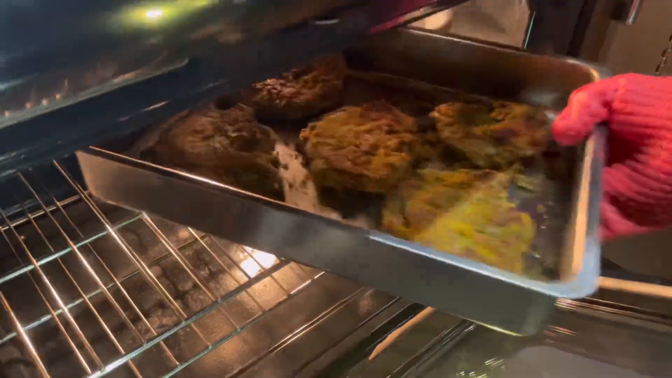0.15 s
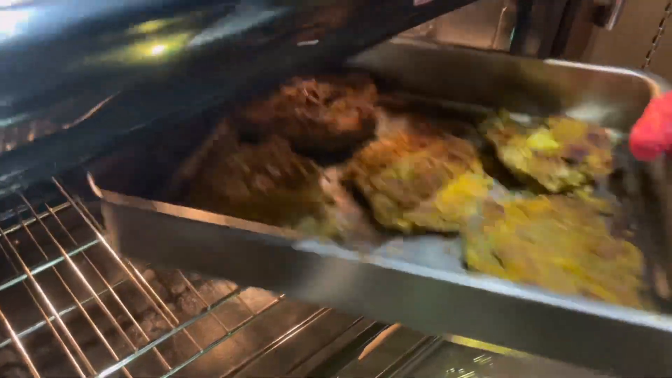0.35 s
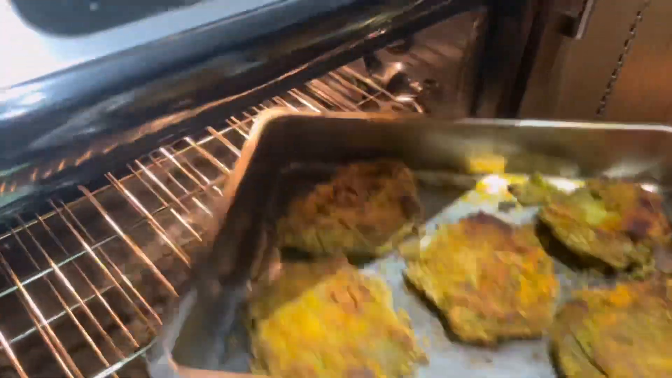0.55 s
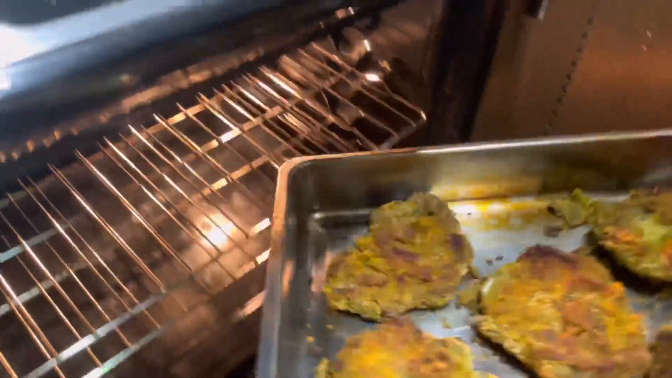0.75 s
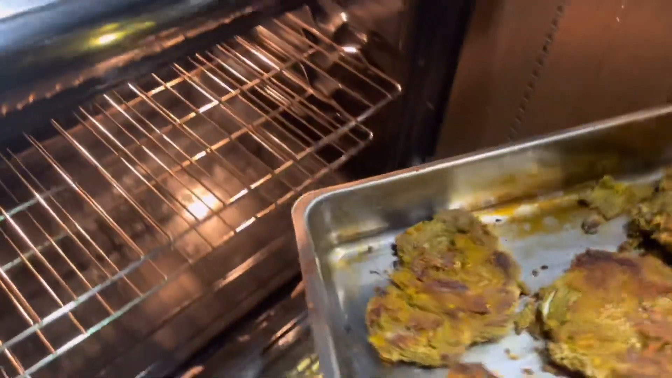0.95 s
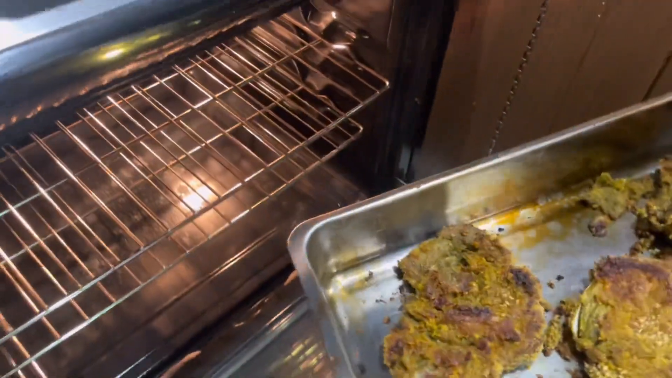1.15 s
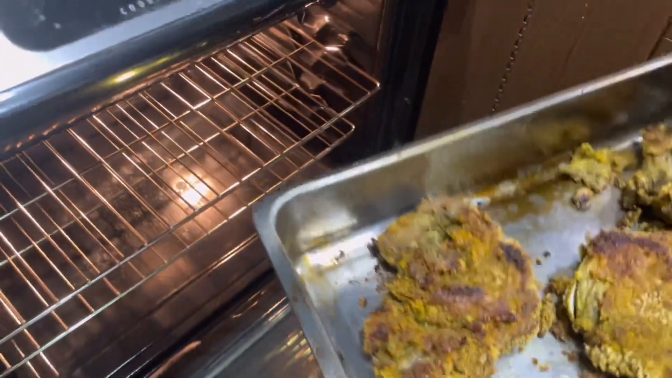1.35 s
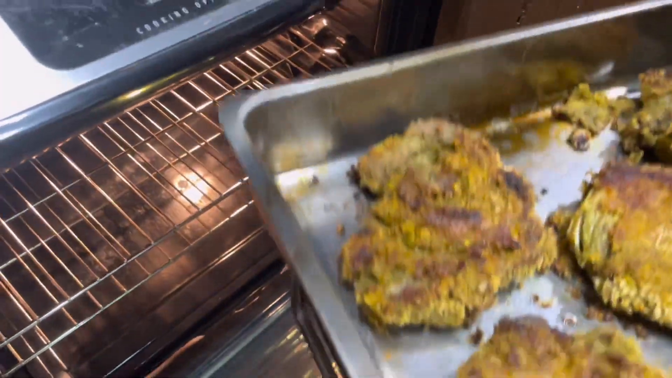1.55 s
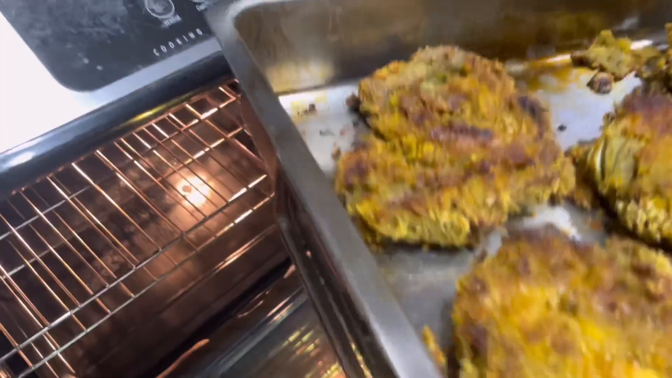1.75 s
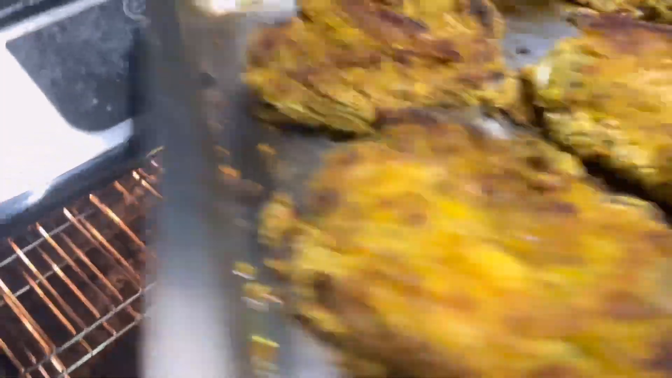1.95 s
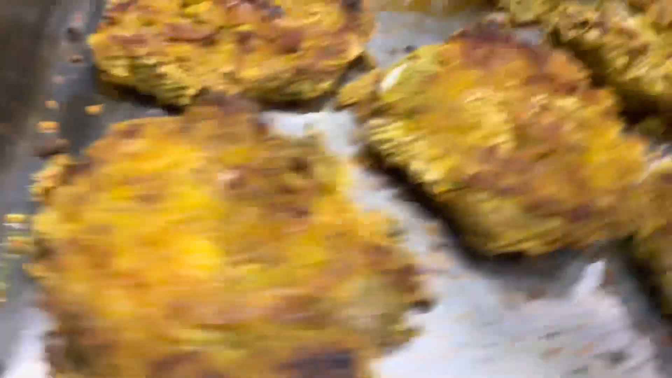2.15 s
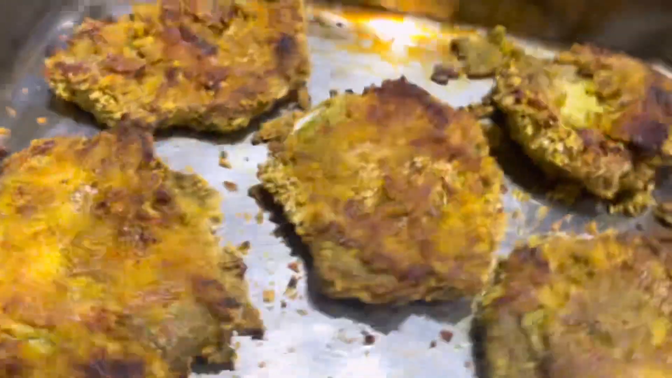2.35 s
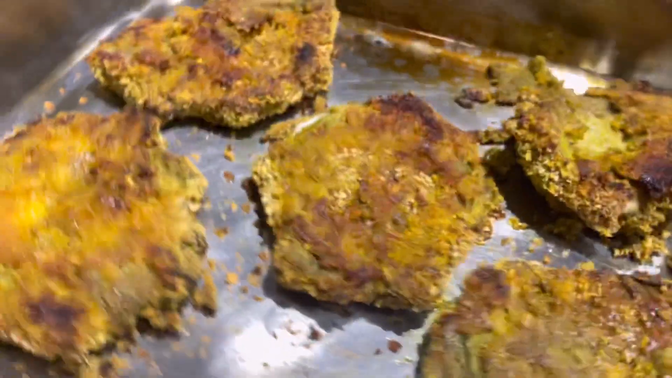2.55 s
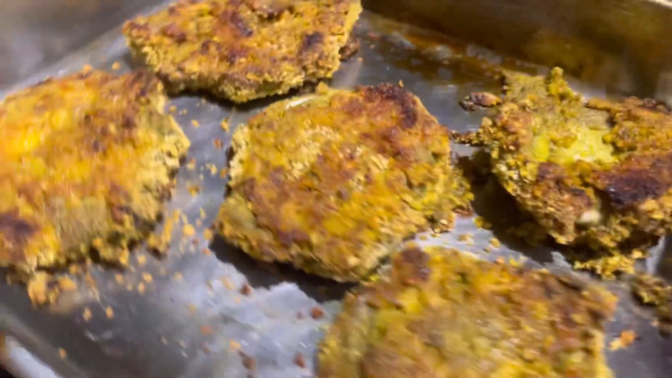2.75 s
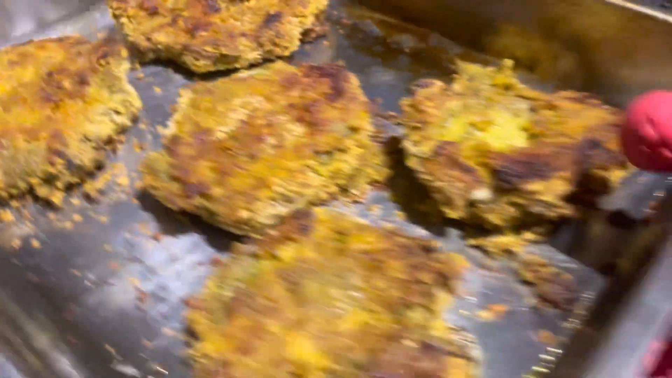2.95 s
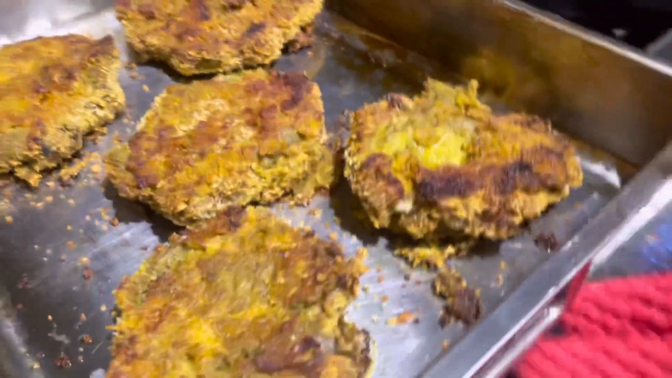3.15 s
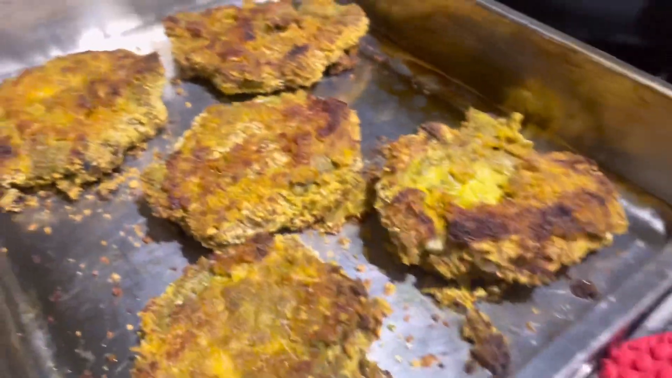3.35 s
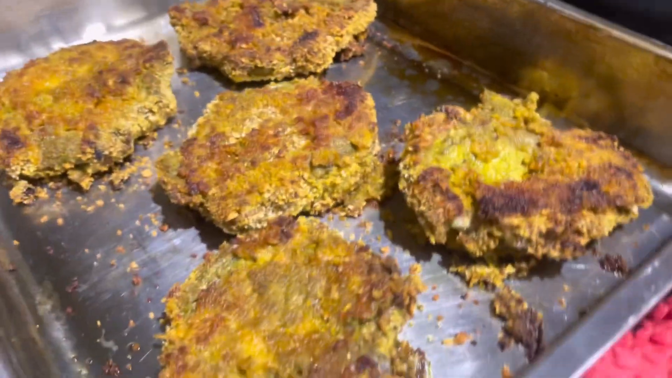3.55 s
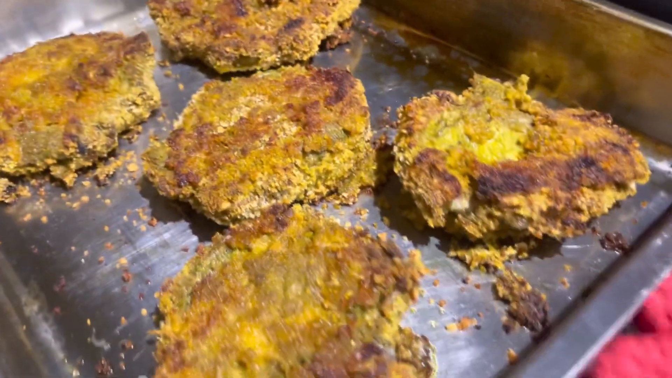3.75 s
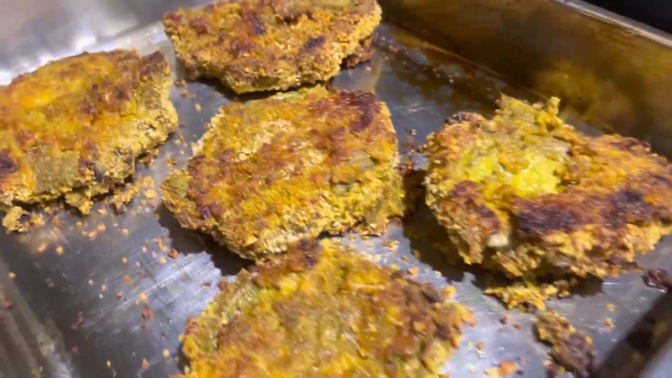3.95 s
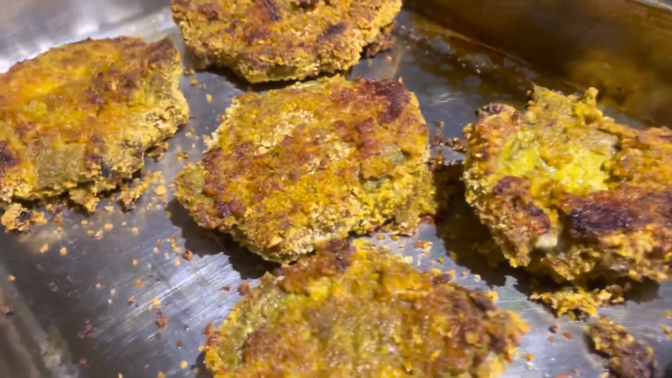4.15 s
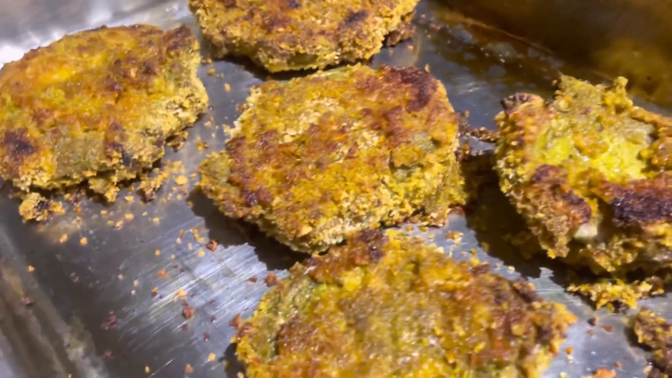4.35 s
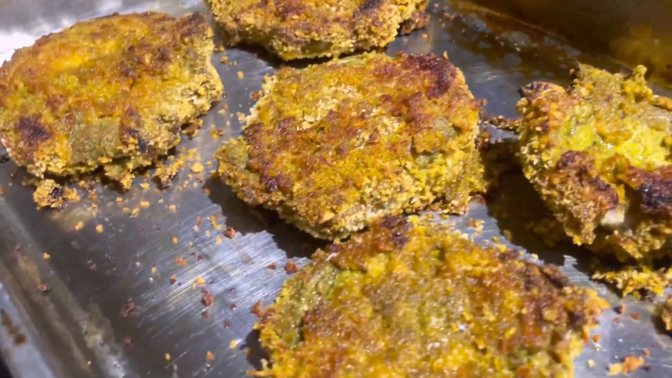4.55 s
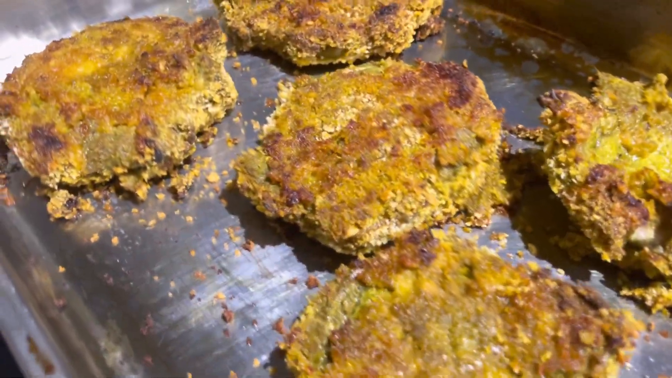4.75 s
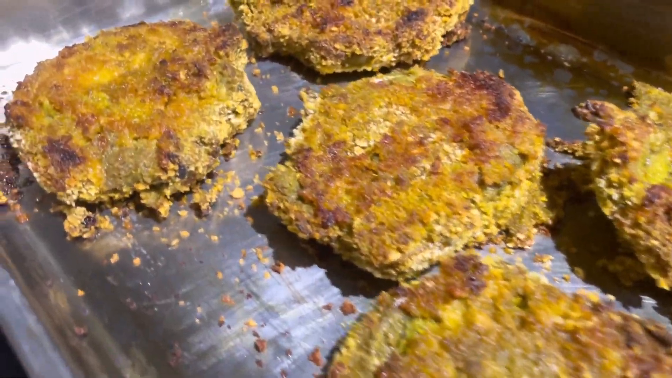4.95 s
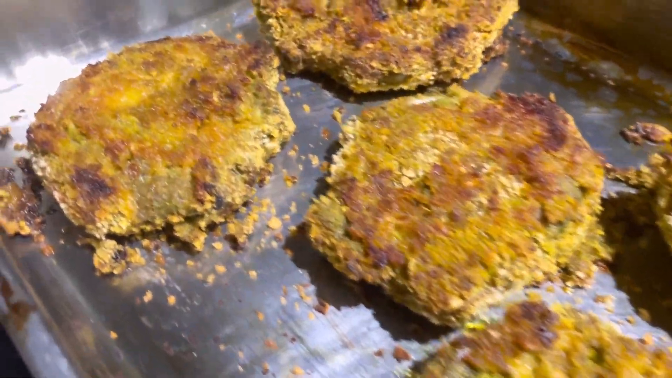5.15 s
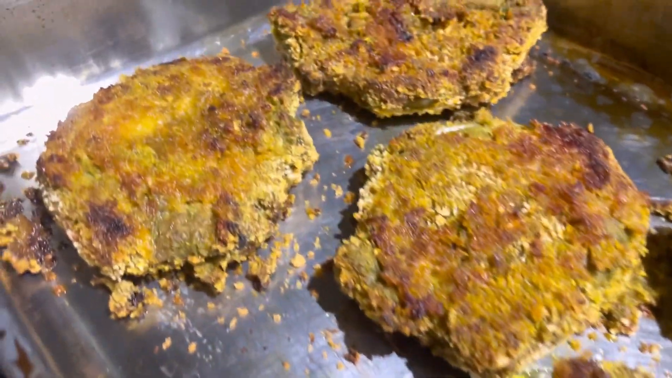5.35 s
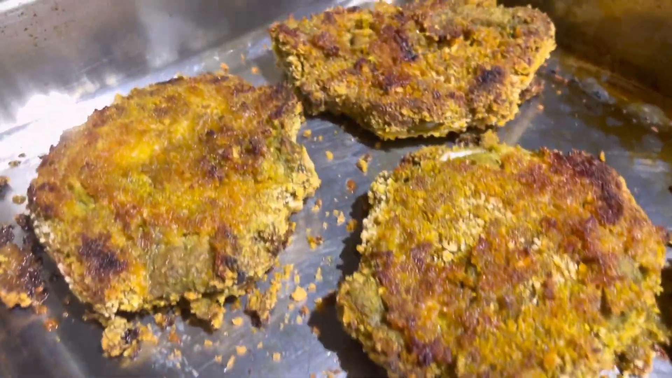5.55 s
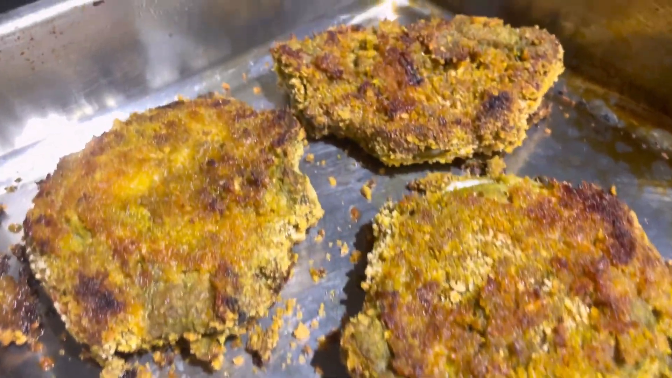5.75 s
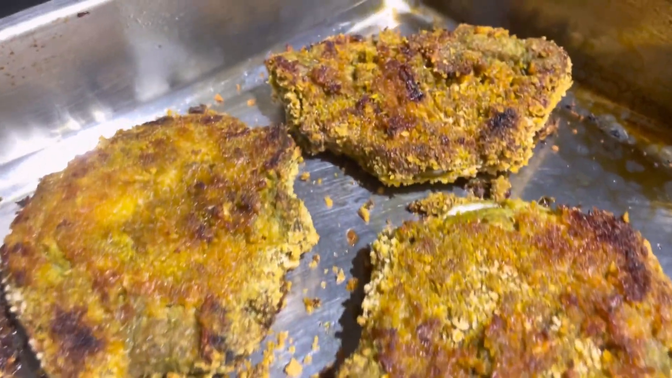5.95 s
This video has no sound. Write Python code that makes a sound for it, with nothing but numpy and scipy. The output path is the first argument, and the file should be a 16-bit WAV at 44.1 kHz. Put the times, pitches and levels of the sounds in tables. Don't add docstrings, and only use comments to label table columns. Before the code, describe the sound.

A baking tray clicks and scrapes out of an oven, bangs a few times mid-way, and finally settles with soft thuds and faint squeaks over constant fan hum.

```python
import sys
import numpy as np
from scipy import signal
from scipy.fft import rfft, irfft, next_fast_len
from scipy.io import wavfile
from scipy.ndimage import uniform_filter1d

SR = 44100
rng = np.random.default_rng(int(sys.argv[2]) if len(sys.argv) > 2 else 0)


def to_linear_factor(level_db):
    exponent = np.asarray(level_db, float) / 20
    return 10 ** exponent


def transcribe(signal):
    frames = np.atleast_2d(signal).T
    limited = np.clip(frames, -1, 1)
    pcm = np.round(limited * 32767).astype(np.int16)
    wavfile.write(sys.argv[1], SR, pcm)


N = 264644
T = np.arange(N) / SR
HZ = np.fft.rfftfreq(next_fast_len(N), 1 / SR)

# time in seconds, swell in dB.
FAN_SWELL = [(0, 1.5), (.35, -2), (.8, -2.5), (2.2, -2.5), (2.7, 2.5), (3.4, 0), (4.1, 1.5), (4.9, 0.8),
             (5.4, 3), (6, 3)]
# frequency in Hz, level change in dB per dB of swell.
FAN_SHARE = [(60, 1.65), (200, 0.44), (1000, 1.12), (4000, 0.7)]
# time in seconds, turn from 0 (oven) to 1 (worktop), left minus right in dB.
TURN = [(0, 0, 1.5), (.6, 0.064, 2.5), (2.3, 0.44, 2), (3.2, 0.59, 3), (3.9, 0.96, 3.5), (6, 0.92, 2.1)]
# frequency in Hz, level in dB.
HUM_OVEN = [(22, -20), (35, -14), (48, -7), (62, -4.5), (86, -11.5), (128, -3.5), (153, -11.5), (188, 2.5),
            (245, -21), (298, -5), (340, -16.5), (370, -13.5), (420, -20.5), (560, -16)]
AIR_OVEN = [(650, -23.5), (720, -17), (1100, -21), (1350, -19), (1800, -23.5), (2100, -25), (3000, -30),
            (4100, -28.5), (5200, -29.5), (5700, -41.5), (6600, -36), (8800, -40), (12000, -49.5),
            (15800, -54)]
HUM_TOP = [(22, -24), (33, -20), (48, -7.5), (80, -9.5), (110, -2), (130, -2), (160, -5), (290, -3.5),
           (339, -8), (400, -18.5), (476, -11), (526, -15.5), (580, -15.5)]
AIR_TOP = [(650, -30), (900, -24), (1080, -18.5), (1160, -24.5), (1350, -18.5), (1750, -25.5),
           (1850, -27.5), (3000, -34), (4800, -33), (5600, -42), (6600, -38), (8800, -41), (12000, -47.5),
           (15800, -56)]

# start in seconds, peak in dB, ring in Hz, rattle in seconds.
TICKS = [
    (0.095, -21, 2900, 0.0086),
    (0.175, -41, 2740, .01),
    (0.209, -20, 2930, 0.011),
    (0.222, -24, 3280, 0.028),
    (.37, -47, 4900, 0.012),
    (2.801, -19.5, 4300, 0.0073),
    (2.841, -20, 3670, 0.0055),
    (5.567, -36, 2800, 0.012),
]
# start in seconds, hold in seconds, pitch in Hz, level in dB, octave level in dB.
SQUEAKS = [
    (5.57, .018, 5785, -33, -44),
    (5.63, .08, 5770, -58, -78),
    (5.722, .014, 5930, -48, -66),
    (5.74, .008, 6020, -39, -56),
    (5.757, .03, 6010, -49, -49),
    (5.872, .02, 6020, -48, -64),
]
# start in seconds, hold in seconds, fade in seconds per 60 dB, weight in dB, crumbs in dB.
SCRAPES = [(0.32, 0.0035, 0.85, -29.5, -43.5), (0.366, 0.019, 0.53, -35, -57),
           (2.73, 0.18, 0.03, -27.5, -57), (2.768, 0.31, 0, -40, -42.5), (2.953, 0.03, .5, -32, -50.5),
           (3.084, .07, 1.7, -40, -54.5), (3.484, .015, 0.4, -42, -50), (3.606, 0.034, 0.7, -38, -46.5),
           (5.507, 0.02, 0.33, -25, -42), (5.559, 0.063, -0.04, -33.5, -51), (5.708, .05, 0.7, -64, -49)]
# frequency in Hz, width in Hz, level in dB.
SCRAPE_BODY = [(293, 260, -12), (440, 44, 1.5), (575, 210, -2.5), (740, 80, -2.5), (876, 50, -5.5),
               (1022, 74, -4.5), (1220, 240, -9.5), (1800, 780, -19)]

# frequency in Hz, level in dB, T60 in seconds.
LIP = [(473, -19, 0.14), (616, -8.5, 0.2), (707, 1.5, 0.068), (818, -9, 0.29), (1028, -19, 0.07),
       (1180, -1, 0.065), (1790, -16, .06), (1920, -30, 0.035), (2400, -8, 0.054), (2850, -33, 0.034),
       (3500, -8, 0.031), (4660, -7, 0.039), (4900, -27, 0.26), (7170, -3, 0.022)]
THUD = [(150, -3, 0.066), (213, 2, 0.14), (334, -36, 0.045)]
CORNER_A = [(204, -3, 0.11), (300, -3, 0.047), (381, 1, 0.089), (554, -8, .09), (783, 4.5, 0.049),
            (880, -13, .07), (1017, 1, 0.044), (1490, -6, 0.03), (1710, -9, 0.054), (1930, 3, 0.014),
            (2796, 0, 0.041), (3310, -6, 0.03), (3910, -7.5, 0.027), (5290, -9, 0.032)]
CORNER_B = [(612, -7, 0.1), (870, -26, .07), (686, 2, 0.12), (715, -2, 0.17), (755, 14.5, 0.01),
            (1040, -1.5, 0.04), (1350, -4, 0.034), (1710, -14, .04), (2080, 0, 0.028), (2450, -13, .035),
            (2800, -7, 0.087), (3430, -11, 0.054), (4550, -21, 0.071)]
CORNER_C = [(358, -8.5, 0.039), (450, -4, 0.088), (797, 2, 0.045), (953, 0.5, 0.039), (1220, -4, 0.027),
            (1495, -7, 0.04), (1985, -12, 0.022), (2370, -16, 0.026), (2900, -3, 0.0091),
            (4590, -21, 0.042)]
BASE = [(71.3, 0, 0.37), (124, 1, 0.12), (203, -0.5, 0.096), (283, -4.5, 0.092), (354, 3, 0.094),
        (468, -13, 0.06), (1470, -0.5, 0.022), (2020, -3, 0.038), (3980, -17, 0.065)]
# modes struck, then their blows, each of
# start in seconds, ring in dB, crack in dB, rattle in milliseconds.
KNOCKS = [
    (LIP, [(.316, -25, -17, 4.5), (.319, -14.5, -15, 10.4), (.35, -23, -28, 10)]),
    (THUD, [(.327, -11, -18, 4)]),
    (CORNER_A, [(2.523, -12, -16.5, 3.6), (2.54, -19, -34, 2)]),
    (CORNER_B, [(2.618, -14.5, -22, 4.9), (2.654, -18.5, -31, 2.5)]),
    (CORNER_C, [(2.719, -9.5, -19.5, 3.9), (2.722, -8.5, -15.5, 1.2), (2.771, -25, -13.5, 1.2), (2.878, -23.5, -38, 10), (2.975, -25, -32, 13), (3.017, -28, -34, 6.3), (3.063, -39, -29.5, 7.7)]),
    (BASE, [(5.516, -20, -34.5, 13), (5.521, -21.5, -22.5, 10.3), (5.538, -22, -32, 7.5), (5.562, -28, -24.5, 26), (5.614, -20, -34, 5.4), (5.63, -24, -32, 4.7), (5.695, -27, -56, 4.3), (5.952, -25, -39, 5.6)]),
]
# frequency in Hz, level in dB.
CRACK = [(150, -24), (400, 3.5), (900, -2), (2000, -2), (3500, -5), (5500, -11), (8000, -11.5),
         (12000, -13), (15900, -27)]

ECHO_LAGS = [(37, 113, 241, 467), (43, 139, 197, 541)]
# frequency in Hz, likeness from 0 to 1.
LIKENESS = [(60, 0.95), (200, 0.99), (400, 0.87), (750, 0.54), (2400, 0.5), (3800, 0.64), (5500, 0.33),
            (7200, 0.9), (8000, 0.69), (8700, 0.93), (9600, 0.66), (10400, 0.59), (12000, 1)]
# frequency in Hz, phase of the right port in radians.
PORT_PHASE = [(100, -.05), (1000, -.45), (2400, -.95), (4500, -.8), (6400, .6), (7250, 2.1), (7900, 2.98),
              (8700, 3.13), (9600, 3.3), (10100, 3.9), (11400, 4.8), (12700, 5.6)]


def on_log(hz, table):
    f, v = np.transpose(table)
    return np.interp(np.log(np.maximum(hz, 1)), np.log(f), v)


def colour(x, gain):
    size = next_fast_len(N)
    return irfft(rfft(x, size) * gain, size)[..., :N]


def unit(x):
    return x / np.sqrt(np.mean(x ** 2))


def bell(hz, width):
    return 1 / np.sqrt(1 + ((HZ ** 2 - hz ** 2) / (np.maximum(HZ, 1) * width)) ** 2)


def add(out, start_s, x):
    i = int(start_s * SR)
    out[i:i + len(x)] += x[:N - i]


def smooth_twice(x, size):
    return uniform_filter1d(uniform_filter1d(x, size, axis=1), size, axis=1)


def drift(place, count, frames, size):
    walks = unit(smooth_twice(rng.standard_normal((count, frames)), size))
    return np.array([np.interp(place, np.arange(count), column) for column in walks.T]).T


def walk(size):
    held = np.repeat(rng.standard_normal(N // size + 1), size)[:N]
    return unit(uniform_filter1d(held, size))


def stroke(start_s, attack_s, hold_s, fade_s):
    rise = np.clip((T - start_s) / attack_s, 0, 1)
    fall = np.clip((T - start_s - attack_s - hold_s) / max(fade_s, .01), 0, 3)
    return rise * to_linear_factor(-60 * fall)


def ring(hz, t60, count=16384):
    t = np.arange(count) / SR
    swell = 1 - np.exp(-t * hz / 0.4)
    return swell * np.sin(2 * np.pi * hz * t) * to_linear_factor(-60 * t / t60)


def rattle(length_s):
    count = 4096
    t = np.arange(count) / SR
    chatter = rng.standard_normal(count) * to_linear_factor(1.5 * rng.exponential(size=count) - 2)
    fall = np.exp(-t / length_s) + to_linear_factor(-17) * np.exp(-t / .018)
    return chatter * (1 - np.exp(-t / 0.00023)) * fall


def fan():
    frame = 4096
    hz, s, z = signal.stft(rng.standard_normal((3, N)), SR, nperseg=frame)
    turn_s, turn, _ = np.transpose(TURN)
    mix = np.interp(s, turn_s, turn)
    oven = on_log(hz, HUM_OVEN + AIR_OVEN)[:, None]
    top = on_log(hz, HUM_TOP + AIR_TOP)[:, None] + 1.0
    swell = on_log(hz, FAN_SHARE)[:, None] * np.interp(s, *np.transpose(FAN_SWELL))

    broad = drift(3 * np.log2(np.maximum(hz, 20) / 20), count=30, frames=len(s), size=4)
    narrow = drift(hz / 55, count=400, frames=len(s), size=9)
    narrow *= np.clip((hz[:, None] - 300) / 400, 0, 1) / (1 + hz[:, None] / 3500)

    gain = to_linear_factor((1 - mix) * oven + mix * top + swell + broad + 5.9 * narrow)
    return to_linear_factor(-27.5) * unit(signal.istft(z * gain, SR, nperseg=frame)[1][:, :N])


def ticks():
    wires, fizz = np.zeros(N), np.zeros(N)
    for start_s, db, hz, rattle_s in TICKS:
        chatter = to_linear_factor(db) * rattle(rattle_s)
        add(wires, start_s, signal.fftconvolve(chatter, ring(hz, .012, count=4096)))
        add(fizz, start_s, chatter)
    return to_linear_factor(-23) * wires + colour(fizz, bell(3300, 4000) ** 1.8)


def squeak():
    attack_s, fade_s = 0.0038, 0.011
    rise_hz, rise_s = 50, 0.016
    shaky_s = np.cumsum(1 + .008 * walk(size=60)) / SR
    out = np.zeros(N)
    for start_s, hold_s, hz, db, octave_db in SQUEAKS:
        climb = rise_hz * rise_s * np.exp(-np.maximum(T - start_s, 0) / rise_s)
        phase = 2 * np.pi * (hz * shaky_s + climb)
        tone = to_linear_factor(db) * np.sin(phase) + to_linear_factor(octave_db) * np.sin(2 * phase)
        out += stroke(start_s, attack_s, hold_s, fade_s) * tone
    flutter = to_linear_factor(0.9 * walk(size=150))
    return np.sqrt(2) * flutter * out


def scrapes():
    slip = 300
    slips = rng.standard_normal((3, N)) * to_linear_factor(1.5 * rng.exponential(size=N))
    stutter = to_linear_factor(1.8 * walk(size=slip))

    body = np.zeros(N)
    for hz, width, db in SCRAPE_BODY:
        flare = to_linear_factor(db + 3.5 * walk(size=4 * slip))
        body += flare * colour(slips[0], bell(hz, width) ** 2)
    body = unit(body)
    grit = to_linear_factor(5.5) * unit(colour(slips[1], bell(1700, 3300) ** 2))
    hiss = to_linear_factor(-0.5) * unit(colour(slips[2], bell(9300, 10000) ** 2))

    weight, crumbs = np.zeros(N), np.zeros(N)
    for start_s, hold_s, fade_s, weight_db, crumbs_db in SCRAPES:
        slide = stroke(start_s, 0.013, hold_s, fade_s)
        weight += to_linear_factor(weight_db) * slide
        crumbs += to_linear_factor(crumbs_db) * slide
    return stutter * (weight * body + crumbs * grit) + crumbs * np.sqrt(stutter) * hiss


def knocks():
    t_ms = 1000 * np.arange(4096) / SR
    tone, crack = np.zeros(N), np.zeros(N)
    for modes, blows in KNOCKS:
        body = 0
        for k, (hz, db, t60) in enumerate(modes):
            body = body + (-1) ** k * to_linear_factor(db) * ring(hz, t60)
        for start_s, ring_db, crack_db, rattle_ms in blows:
            rattle_s = rattle_ms / 1000
            contact_ms = 0.17 * to_linear_factor(-15.5 - crack_db)
            push = t_ms * np.exp(-t_ms / (0.14 * contact_ms))
            force = push / push.sum() + 0.051 * rattle(rattle_s)
            add(tone, start_s, to_linear_factor(ring_db) * signal.fftconvolve(body, force))
            add(crack, start_s, to_linear_factor(crack_db) * rattle(rattle_s))
    return tone + colour(crack, 1.13 * unit(to_linear_factor(on_log(HZ, CRACK))))


def scatter(x, lags):
    gain = .42
    delay = np.exp(-2j * np.pi * HZ[:, None] * np.array(lags) / SR)
    return colour(x, np.prod((delay - gain) / (1 - gain * delay), axis=1))


def scene():
    shared, *own = fan()
    tray = ticks() + squeak() + scrapes() + knocks()
    like = np.clip(on_log(HZ, LIKENESS), 0, 1)
    near = like + (1 - like) * .3 * bell(1500, 6000)
    ports = []
    for own_air, lags in zip(own, ECHO_LAGS):
        air = colour(shared, like ** .5) + colour(own_air, (1 - like) ** .5)
        echoes = colour(scatter(tray, lags), (1 - near) ** .5)
        ports.append(air + colour(tray, near ** .5) + echoes)
    ports = np.array(ports)

    turn_s, _, pan_db = np.transpose(TURN)
    balance = to_linear_factor(np.interp(T, turn_s, pan_db) * np.array([[.5], [-.5]]))
    low = colour(ports, 1 / (1 + (HZ / 2800) ** 4))
    return ports - low + low * balance


def band_limit(x):
    return signal.sosfilt(signal.butter(12, 16500, fs=SR, output="sos"), x)


def record(dry):
    left = dry[0]
    right = colour(dry[1], np.exp(1j * on_log(HZ, PORT_PHASE)))
    low_cut = 1 / np.sqrt(1 + (42 / np.maximum(HZ, 1)) ** 6)
    mid = colour((left + right) / 2, low_cut * (HZ < 15900))
    side = colour((left - right) / 2, low_cut * (HZ < 12600))
    ports = np.tanh(.8 * np.array([mid + side, mid - side])) / .8
    return band_limit(ports)


dry = scene()
out = record(dry)
transcribe(out)
```